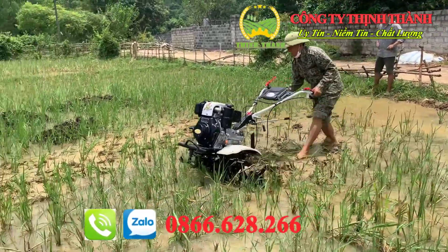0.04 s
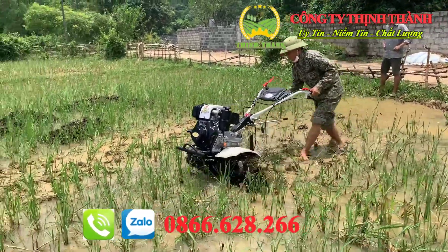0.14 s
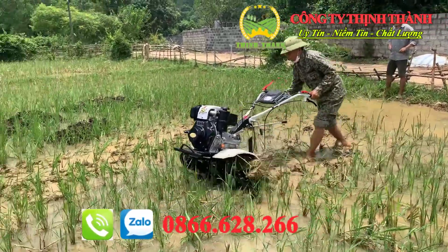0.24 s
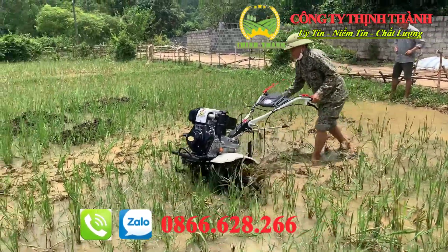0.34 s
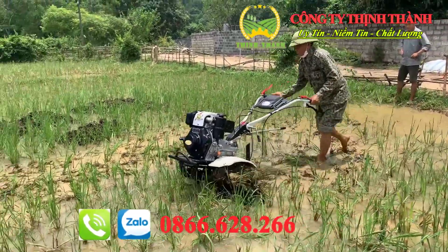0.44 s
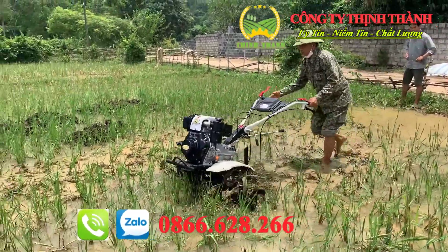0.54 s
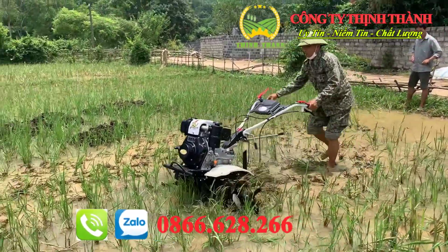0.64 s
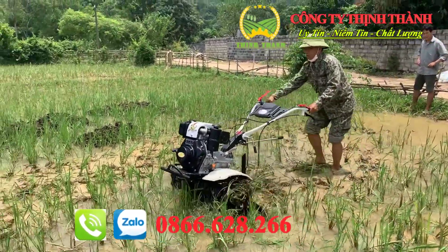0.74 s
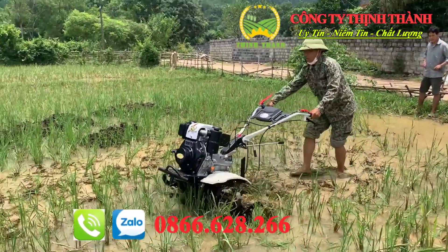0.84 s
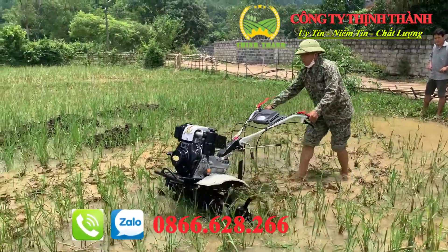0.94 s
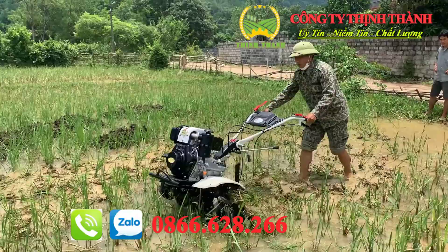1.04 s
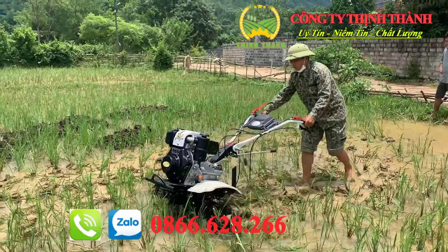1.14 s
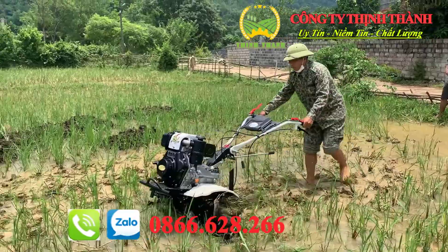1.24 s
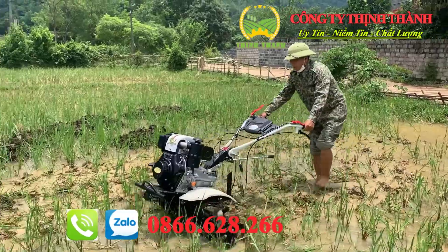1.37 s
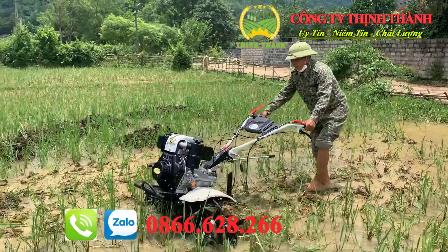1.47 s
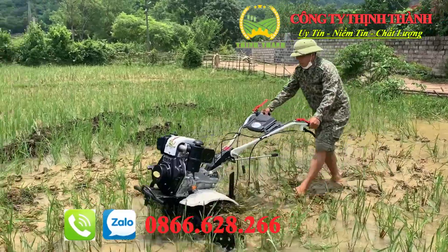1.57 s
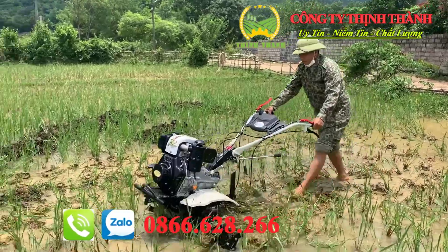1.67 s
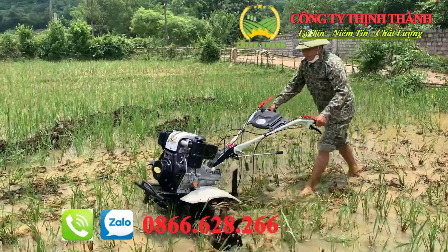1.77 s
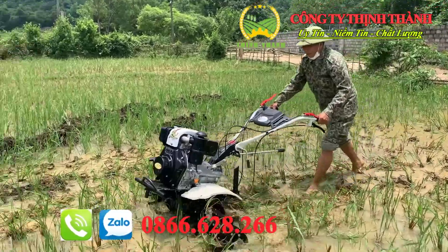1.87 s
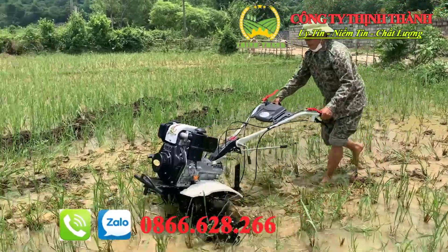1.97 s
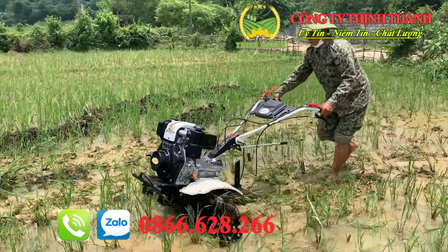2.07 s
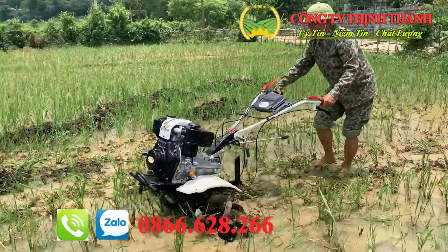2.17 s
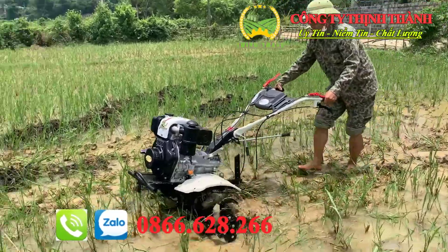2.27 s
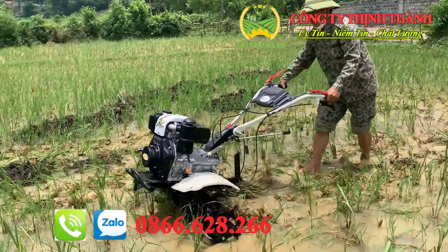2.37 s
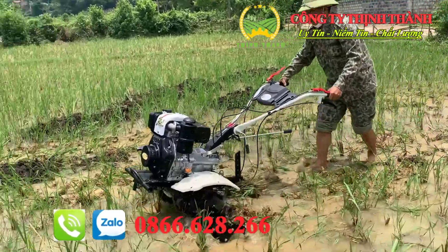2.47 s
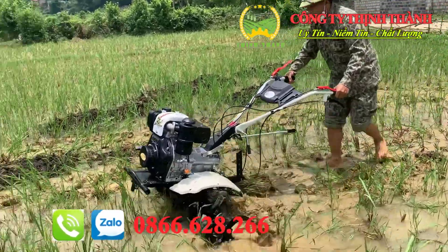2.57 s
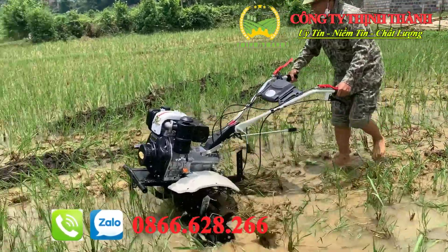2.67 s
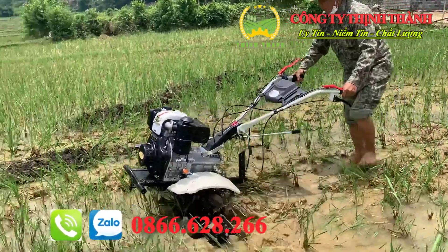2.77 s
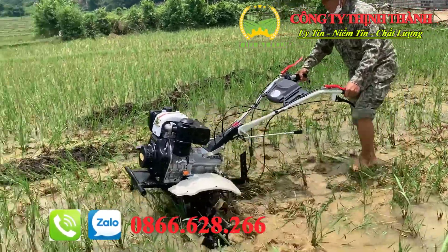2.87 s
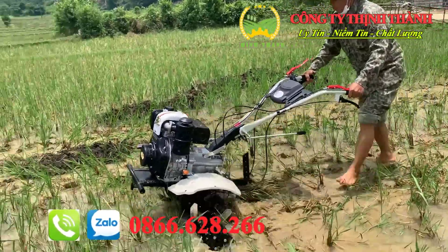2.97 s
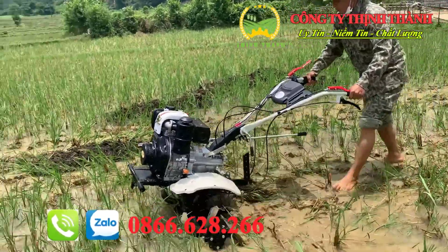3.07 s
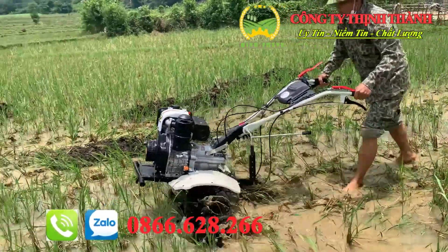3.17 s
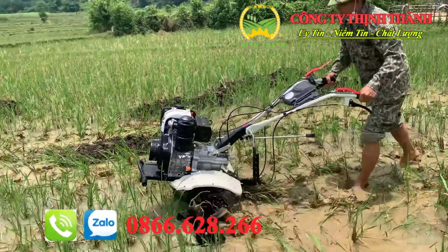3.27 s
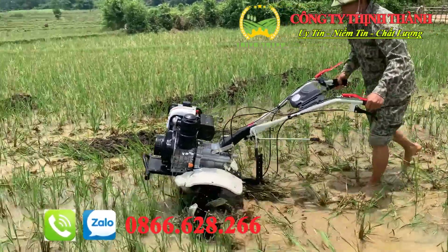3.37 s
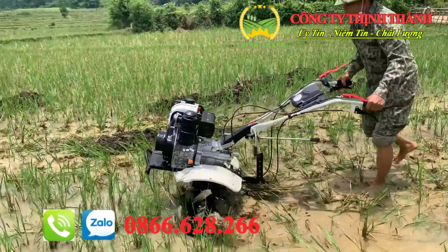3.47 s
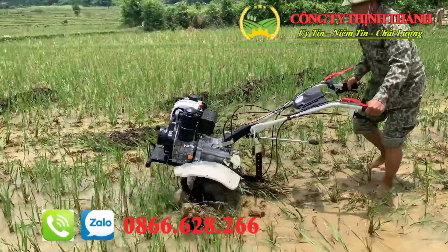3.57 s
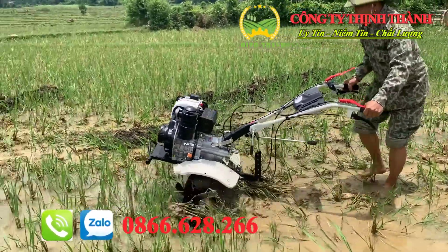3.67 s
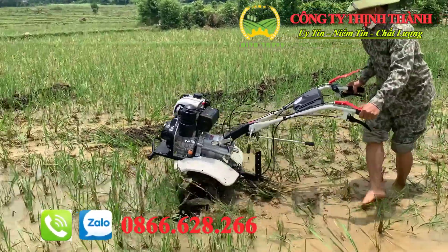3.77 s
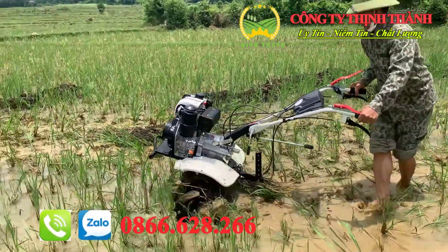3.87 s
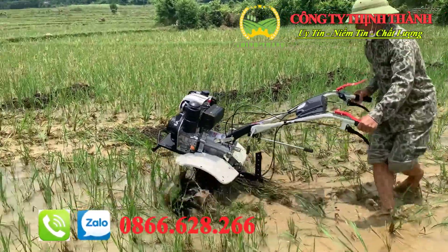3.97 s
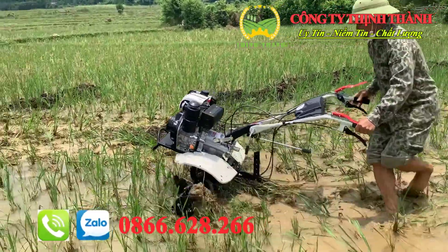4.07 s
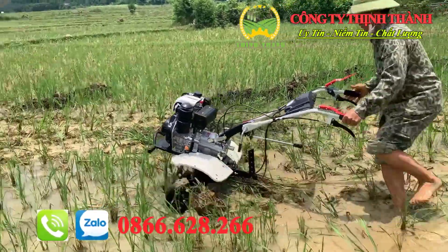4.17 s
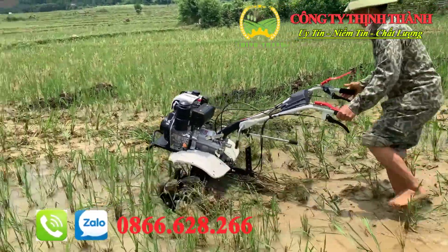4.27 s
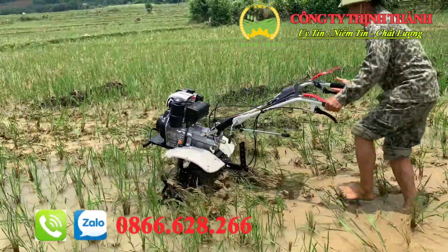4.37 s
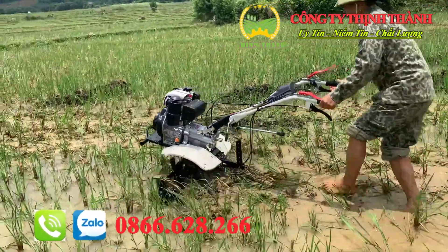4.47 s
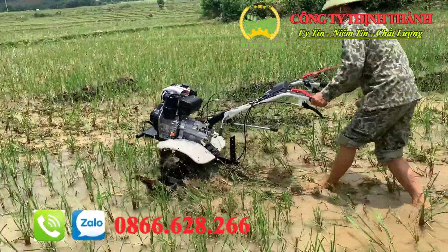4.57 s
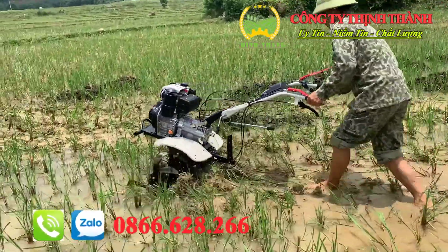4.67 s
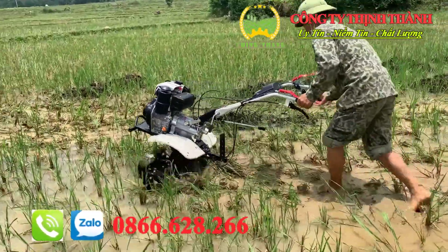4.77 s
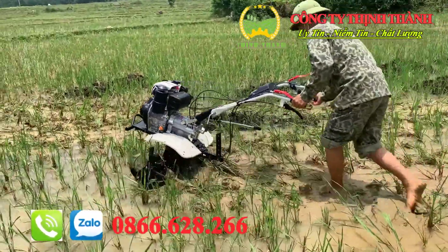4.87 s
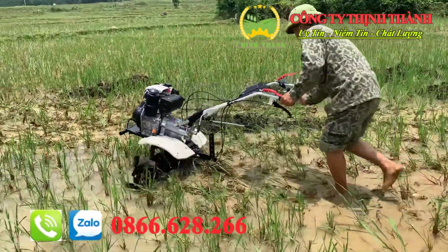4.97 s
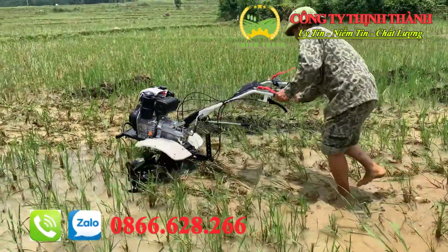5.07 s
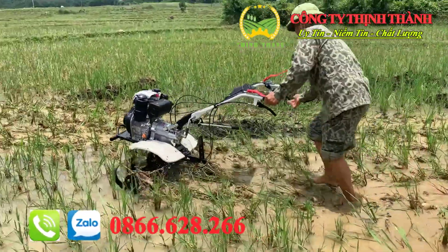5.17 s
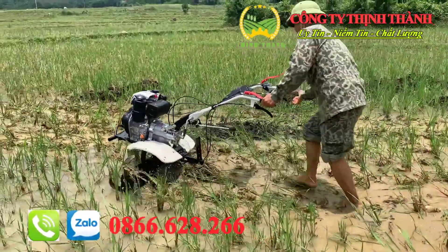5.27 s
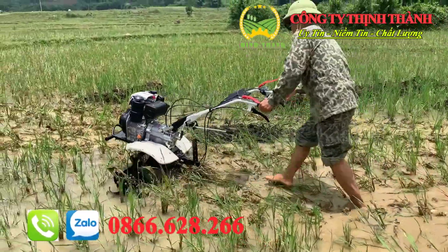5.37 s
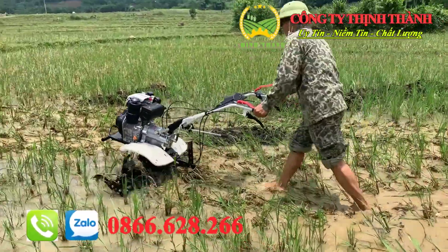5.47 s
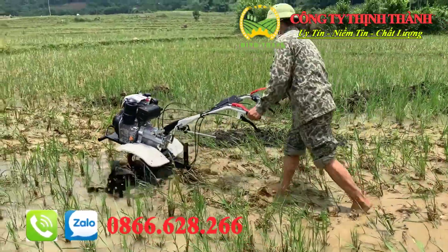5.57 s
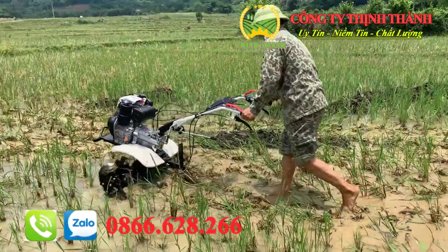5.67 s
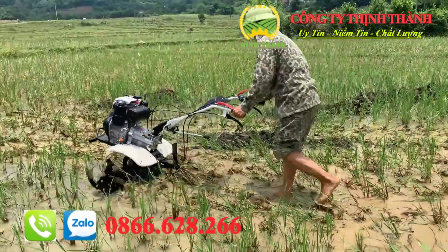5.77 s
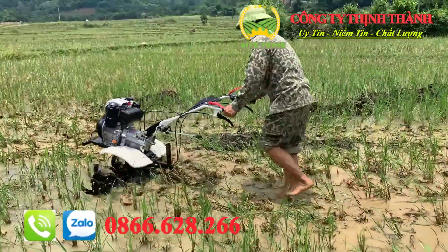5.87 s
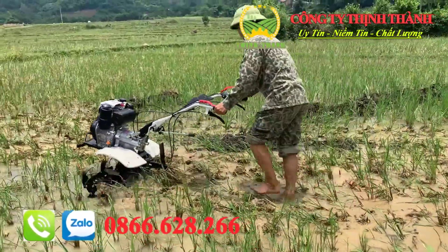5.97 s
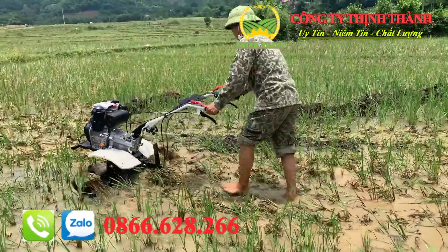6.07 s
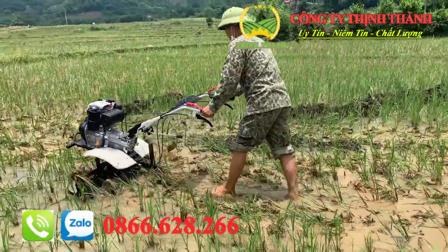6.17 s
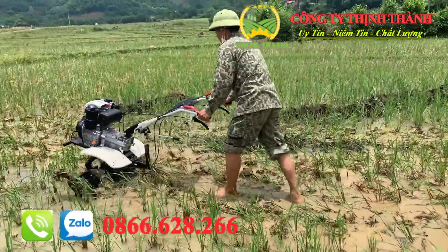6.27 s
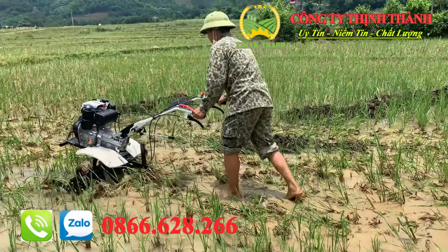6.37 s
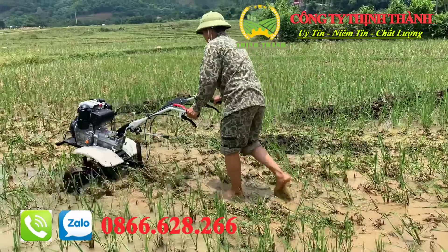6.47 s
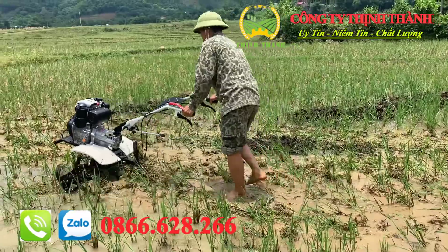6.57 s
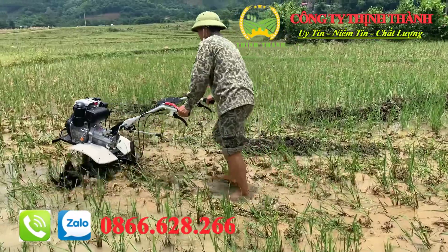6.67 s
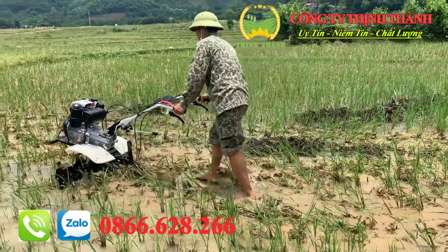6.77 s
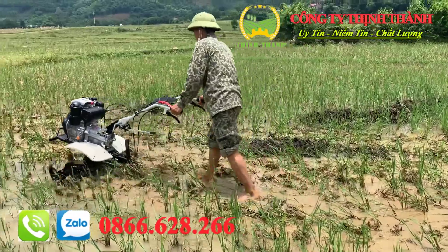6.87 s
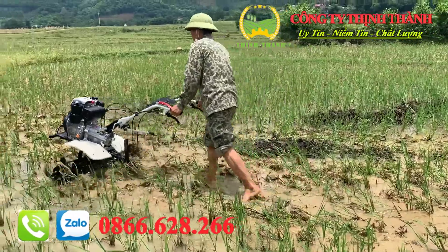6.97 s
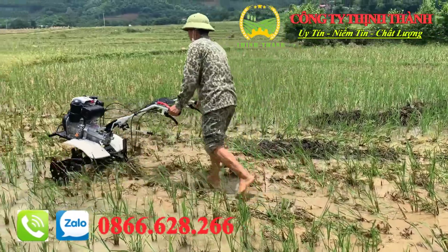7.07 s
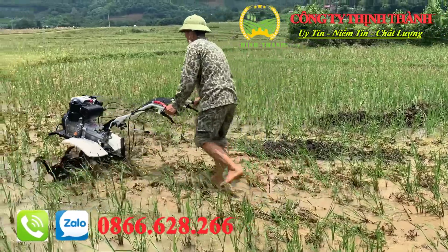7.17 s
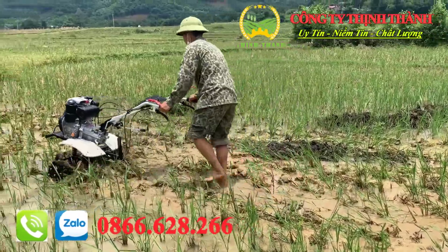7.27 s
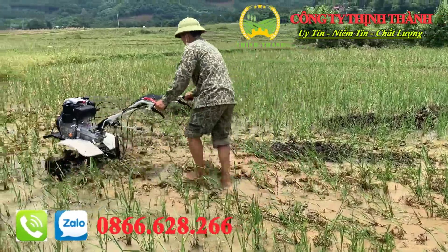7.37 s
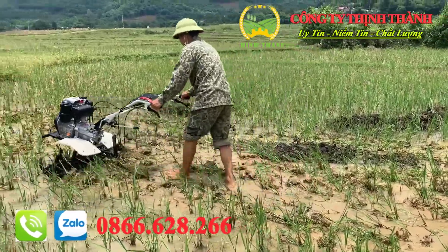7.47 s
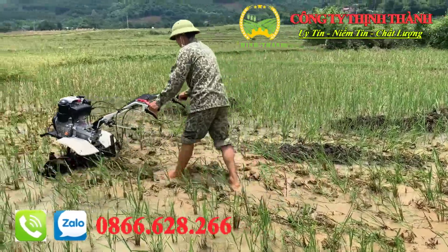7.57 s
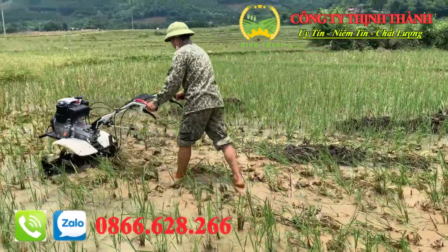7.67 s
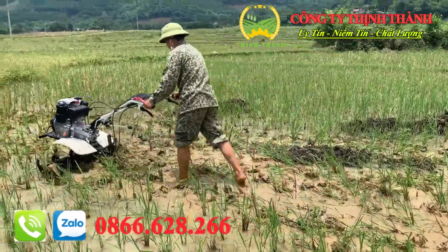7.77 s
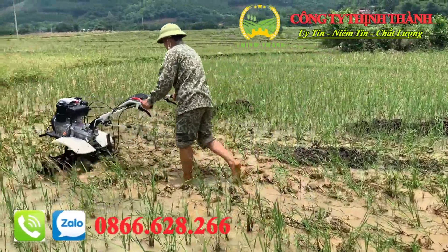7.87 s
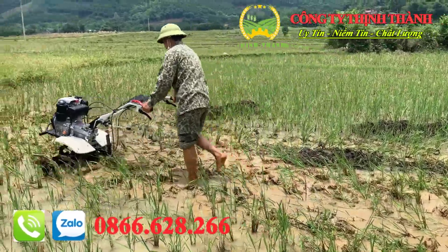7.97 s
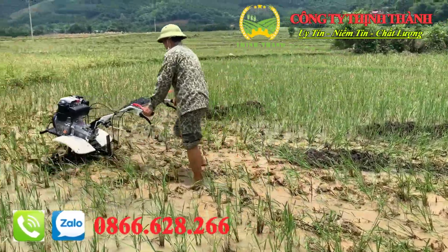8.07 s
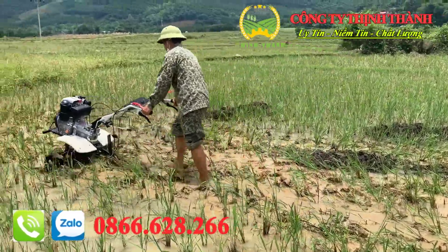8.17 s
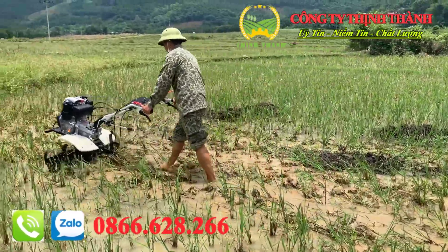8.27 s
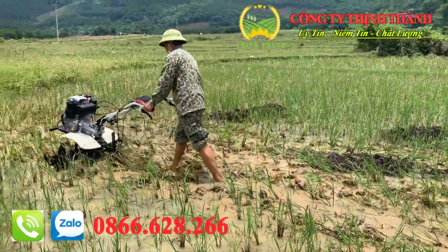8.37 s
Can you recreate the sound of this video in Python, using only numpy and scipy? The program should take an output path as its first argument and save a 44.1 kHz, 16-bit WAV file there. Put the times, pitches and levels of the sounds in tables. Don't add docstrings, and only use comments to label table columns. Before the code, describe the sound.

A walking tiller's diesel engine hammers continuously from start to end, its low muffler throb under rapid metal knocking, buzzing loose parts and bright hiss. Blades stir wet soil only faintly beneath. Heard on a close handheld stereo microphone in open air, it swells to its nearest point before midway, then recedes slightly leftward, with tail-pipe tone more exposed and faint dull reflections from banks and a wall.

```python
import sys
import numpy as np
from scipy import signal
from scipy.fft import rfft, irfft, next_fast_len
from scipy.io import wavfile
from scipy.ndimage import uniform_filter1d, map_coordinates

SR = 44100
rng = np.random.default_rng(int(sys.argv[2]) if len(sys.argv) > 2 else 0)


def output_pcm(signal):
    pcm = np.clip(np.atleast_2d(signal).T, -1, 1) * 32767
    wavfile.write(sys.argv[1], SR, np.round(pcm).astype(np.int16))


def makeup_ratio(level_db):
    decades = np.asarray(level_db, float) / 20
    return 10 ** decades


N = 371763

NEAR_M = 3.0

# time_s, rate_cycles_per_s
SPEED = [(0.0, 22.077), (0.48, 22.359), (0.79, 22.192), (1.08, 22.378), (1.87, 22.076), (2.45, 22.135),
         (3.48, 22.498), (4.08, 22.353), (4.18, 22.077), (4.59, 21.627), (5.08, 22.036), (5.84, 22.0),
         (6.32, 21.776), (6.63, 22.055), (7.26, 21.873), (7.81, 22.332), (7.97, 22.095), (8.43, 22.316)]
# time_s, distance_m, heading_deg (0 = facing the listener), left_lead_samples
PASS = [(0, 5.4, 3.7, 0.64), (1, 4.98, 20.6, 1.24), (2, 4.25, 33, 2), (2.8, 3.72, 68.4, 2),
        (3.4, 3.5, 82.5, 1.3), (3.9, 3.83, 116, 1.7), (4.6, 4.54, 125, 1.9), (5.5, 4.62, 136.3, 4.45),
        (6.5, 4.5, 162, 5.6), (7.5, 4.9, 169.5, 6.1), (8.43, 5.2, 171, 6.2)]
HEADINGS = [0, 45, 68, 90, 135, 155, 180]
RADIATES_DB = {"muffler": (-14.5, -15.5, -15, -15.5, -15.5, -17, -16.5),
               "chuff": (-24.5, -27.5, -33, -34, -36, -34, -30.5),
               "tail mode": (-41, -38, -53, -55, -32, -31.5, -28),
               "gear": (-40.5, -35.5, -35, -34, -43, -53, -37),
               "valve pop": (-22.5, -29, -29, -28, -25.5, -24, -25.5),
               "port thump": (-47.5, -36.5, -38.5, -35.5, -41, -48, -47),
               "cowl": (-36.5, -28.5, -28.5, -25.5, -27.5, -30, -29.5),
               "block": (-23.5, -29, -27.5, -26, -26, -30, -32),
               "head": (-26, -31, -29, -32.5, -36.5, -36, -32.5),
               "rattle": (-24, -23.5, -25, -25.5, -23.5, -25, -25),
               "hiss": (-33, -31.5, -32, -32.5, -31, -32, -31.5)}
METAL_AHEAD = (.022, 0.0035)

# place_in_cycle, signed_strength, pitch_hz, t60_s
PUFFS = [
    (.995, -2.05, 66, .087),
    (.452, 7.0, 136, .057),
    (.667, 3.9, 132, .135),
]
# place_in_cycle, start_hz, climb_hz_per_s, rise_s
POP = [
    (0.576, 700, 114600, 0.00086),
    (0.575, 784, 61000, 0.00093),
]
# peak_place_in_cycle, pitch_hz, t60_s, level_db, heading_deg, beam_width_deg
KNOCKS = [(.07, 760, 0.0148, -40.5, 69, 33), (.105, 799, .012, -30, 131, 21.6),
          (0.5, 800, 0.012, -51, 46, 23), (.09, 926, 0.01417, -28, 2, 39),
          (.15, 980, 0.0107, -36.5, 10, 31), (.22, 1114, 0.0149, -31.5, 56, 16),
          (.1, 1400, 0.0124, -33, 71, 18), (.105, 926, 0.0115, -29.5, 104, 23),
          (.115, 1015, 0.01117, -25, 148.5, 21.8), (.3, 1080, 0.0132, -31.5, 172, 16),
          (0, 1284, 0.01305, -26.5, 3, 11), (.19, 1474, 0.0161, -32.5, 50, 24),
          (.07, 1510, 0.0114, -33, 128, 20), (0.15, 1410, 0.01364, -36, 129, 10.5),
          (.35, 1310, 0.0186, -35.5, 120, 13), (.095, 1633, 0.01407, -22, 134, 16.3),
          (.2, 1620, 0.01421, -24.5, 30.5, 14.7), (.07, 1580, 0.0113, -31, 15, 18),
          (.32, 1690, 0.0142, -33.5, 94, 49), (.1, 1593, 0.0141, -30, 181, 22),
          (.125, 1927, 0.00954, -27.5, 42, 22), (.1, 1880, 0.0109, -25, 83, 7),
          (.15, 1835, 0.01465, -28, 139, 16), (.06, 1960, .008, -35, 157, 15),
          (.06, 2300, 0.0081, -34, 102, 20), (0.2, 1100, 0.0208, -39, -3, 10),
          (.645, 900, 0.0179, -29, 152, 19), (.61, 1050, 0.0169, -31.5, 59, 20)]
# place_in_cycle, level_db
BLOWS = [
    (.092, -2),
    (0.169, -6.5),
    (0.301, -10.5),
    (.46, -16.5),
    (0.601, -15.5),
    (.8, -14.5),
]
# place_in_cycle, level_db
SEATS = [
    (.07, 3.5),
    (.33, -7.5),
    (.54, -0.5),
    (.85, 0),
]

# pitch_hz, facing_db, side_on_db, turned_away_db, t60_s
COWL_MODES = [(737, -4.5, -0.5, -14.5, 0.092), (953, -8, -1, -2, 0.09), (1065, -8, -6, -12, 0.099),
              (1220, -5, -16, -7, 0.11)]
# pitch_hz, facing_db, side_on_db, turned_away_db, t60_s
BLOCK_MODES = [(1343, -2, -4, -16, 0.056), (1459.5, -9, -1.5, -4.5, 0.075), (1552, -4, -5, -1, 0.11),
               (1653, -3.5, 5, -2, 0.056), (1779, -0.5, -4.5, -2, 0.095), (1846.4, 3, 1.5, 4.5, 0.11),
               (2157, 3, -2, -15, 0.084)]
# pitch_hz, facing_db, side_on_db, turned_away_db, t60_s
HEAD_MODES = [(2310, 10, 18.5, -4, 0.0072), (2800, -15, -19, -26, 0.011), (3100, 3, 14, -23, 0.013),
              (3370, -15, -9, 0.5, 0.027), (4200, -7, -4, -4, 0.037), (4700, 0, -12, 2, 0.013),
              (4950, -24, -11, -4.5, 0.16), (5810, -7, -6, -10, 0.049), (6150, -22, -8.5, -17, 0.058),
              (8110, -1, 16.5, -9, 0.013)]
# pitch_hz, t60_s, level_db, heading_deg, beam_width_deg
PANELS = [(1170, 0.049, -34, 55, 18), (1950, 0.062, -41, 87, 7.8), (639, 0.07, -42, 108, 69),
          (372, 0.033, -38.5, 64, 16)]

# pitch_hz, level_db
RATTLE = [(250, 1), (400, -15.5), (550, -9.5), (800, -2), (1200, -6.5), (1700, -5.5), (2200, -3),
          (3200, -5), (3800, -16), (4600, -6), (5400, -11.5), (7000, -12), (8000, -17)]
# pitch_hz, level_db (per Hz)
HISS = [(4500, -55), (6000, 9), (8000, 3), (10000, 8), (13000, 6), (15500, -8)]
# pitch_hz, likeness_0_to_1
LIKENESS = [(200, 0.92), (1000, 0.79), (2400, 0.52), (4000, 0.35), (6000, 0.81), (7000, 0.087),
            (7600, 0.22), (14000, 0.64)]
# left_delay_s, right_delay_s, level_db
ECHOES = [
    (.0131, 0.024, -18.5),
    (.0293, 0.026, -14.5),
    (.047, 0.054, -29),
]

# pitch_hz, level_db, lead_rad
PORT = [(30, -2.5, 0.33), (420, -3, -0.082), (650, -5, 0.47), (1410, -1, -0.18), (1675, -3.5, 0.53),
        (3260, 0.5, 1), (3480, 5.5, 1), (4500, 0, -0.99), (5200, -2, 0.48), (7200, -2, -0.27),
        (7400, 3.5, -1.84), (8610, 0.5, -np.pi)]
# pitch_hz, half_width_hz, depth_db
SUM_NULLS = [(8620, 260, -22), (11880, 330, -20), (15250, 480, -25)]
# pitch_hz, half_width_hz, depth_db
LEFT_NULLS = [(520, 70, -7), (2010, 60, -9), (2700, 90, -14), (5500, 140, -9)]
LEFT_LEAD = (3.5, 6.3)


def rms_one(x):
    return x / np.sqrt(np.mean(x ** 2) + 1e-20)


def in_time(rows):
    time_s, *columns = np.transpose(rows)
    return [np.interp(np.arange(N) / SR, time_s, column) for column in columns]


def at_hz(points, hz, axis=1):
    points = np.array(points)
    return np.interp(np.log(hz), np.log(points[:, 0]), points[:, axis])


def drift(rate):
    r = np.exp(-80 * np.pi * rate / SR)
    chance = rng.standard_normal(N // 40 + 2002)
    slow = signal.lfilter([1], [1, -2 * r, r * r], chance)[2000:]
    return np.interp(np.arange(N) / 40, np.arange(len(slow)), rms_one(slow))


def ring(clicks, hz, t60):
    r = makeup_ratio(-60 / (t60 * SR))
    w = 2 * np.pi * hz / SR
    return signal.lfilter([0, np.sin(w)], [1, -2 * r * np.cos(w), r * r], clicks + 1e-18)


def fade(x, hz):
    r = np.exp(-2 * np.pi * hz / SR)
    return signal.lfilter([1 - r], [1, -r], x)


def above(x, hz):
    return signal.sosfilt(signal.butter(4, hz, "high", fs=SR, output="sos"), x)


def ticks(cycles, contacts, spread_db, jitter):
    out = np.zeros(N)
    whole = np.arange(int(cycles[-1]) + 1)
    for place, level_db in contacts:
        chance = rng.standard_normal((len(whole), 2))
        at = np.searchsorted(cycles, whole + place + jitter * chance[:, 0])
        strength = makeup_ratio(level_db + spread_db * chance[:, 1])
        out[at[at < N]] += strength[at < N]
    return out


def clap(cycles, place, hz, t60):
    pulses = ticks(cycles, [(place, 0)], spread_db=1.2, jitter=.001)
    return rms_one(ring(ring(pulses, hz, t60), hz, t60))


def beam(heading, aim, width):
    return np.exp(-((heading - aim) / width) ** 2 / 2)


def banded_noise(spectrum, patchy_db):
    out = 0
    white = rng.standard_normal((2, 2, N))
    lowest, highest = spectrum[0][0], spectrum[-1][0]
    edges = lowest * 2 ** np.arange(0, np.log2(highest / lowest) + 1 / 6, 1 / 3)
    for k, (low, high) in enumerate(zip(edges, edges[1:])):
        band = signal.butter(2, [low, high], "band", fs=SR, output="sos")
        mid, side = signal.sosfilt(band, white[k % 2])
        hz = np.sqrt(low * high)
        alike = np.clip(at_hz(LIKENESS, hz), 0, 1)
        gain = makeup_ratio(at_hz(spectrum, hz) + patchy_db * drift(3.2))
        out = out + gain * (np.sqrt(1 + alike) * mid + np.sqrt(1 - alike) * side * [[1], [-1]])
    return rms_one(out)


def gated(noise, clicks, fall_hz, floor):
    swell = rms_one(fade(fade(clicks, fall_hz), 420))
    return rms_one(noise * (floor + swell))


def muffler(cycles):
    rings = 0
    for place, size, hz, t60 in PUFFS:
        rings = rings + size * ring(ticks(cycles, [(place, 0)], spread_db=.3, jitter=.001), hz, t60)
    soft = fade(fade(rings, 80), 80)
    return rms_one(soft - np.mean(soft))


def chuff(cycles):
    pulses = ticks(cycles, [(.36, 0), (.55, -3)], spread_db=1.0, jitter=.001)
    pulses += makeup_ratio(-45.5) * rng.standard_normal(N)
    low = ring(ring(pulses, 225.0, 0.019), 194.0, 0.051)
    high = ring(ring(pulses, 267, 0.022), 289.6, 0.022)
    return rms_one(low), rms_one(high)


def gear(cycles):
    return makeup_ratio(1.5 * drift(3)) * np.sin(2 * np.pi * 19 * cycles + .15 * drift(8))


def knocks(cycles, heading):
    out = 0
    rate = cycles[-1] * SR / N
    for peak, hz, t60, level_db, aim, width in KNOCKS:
        contact = peak - rate * t60 / np.log(1000)
        out = out + makeup_ratio(level_db) * beam(heading, aim, width) * clap(cycles, contact, hz, t60)
    return out


def struck_body(blows, cycles, away, modes, uneven_db):
    out = np.zeros((2, N))
    whole = cycles.astype(int)
    for k, (hz, *heading_db, t60) in enumerate(modes):
        strength = makeup_ratio(uneven_db * rng.standard_normal(whole[-1] + 1))[whole]
        heard = makeup_ratio(np.interp(away, [0, .5, 1], heading_db) + 2.2 * drift(.7))
        lean = makeup_ratio(1.5 * rng.standard_normal() * np.array([[1], [-1]]))
        out += (-1) ** k * lean * heard * ring(blows * strength, hz, t60)
    return out / np.sqrt(uniform_filter1d(np.mean(out ** 2, axis=0), size=SR // 3))


def valve_pop(cycles, away):
    place, start_hz, climb, rise_s = (np.interp(away, [0, 1], column) for column in np.transpose(POP))
    since = cycles + 1 - place
    s = since % 1 / in_time(SPEED)[0]
    strength = makeup_ratio(1.2 * rng.standard_normal(int(since[-1]) + 2))[since.astype(int)]
    turns = start_hz * s + climb * rise_s * (s - rise_s * np.arctan(s / rise_s))
    swell = (s / rise_s) ** 2 * np.exp(-s / rise_s)
    valve = rms_one(strength * swell * np.sin(2 * np.pi * turns))
    valve += 0.11 * clap(cycles, 0.5, 1046, 0.0093)
    valve += 0.26 * away * clap(cycles, 0.66, 961, 0.041)
    return rms_one(above(valve, 597))


def port_thump(cycles):
    return clap(cycles, .56, 443, 0.021)


def panels(blows, heading):
    out = 0
    for hz, t60, level_db, aim, width in PANELS:
        panel = rms_one(ring(ring(blows, hz, t60), hz, t60 / 4))
        out = out + makeup_ratio(level_db) * beam(heading, aim, width) * panel
    return out


def rattle(cycles):
    shaken = ticks(cycles + 0.021, BLOWS, spread_db=1.8, jitter=0.013)
    return gated(banded_noise(RATTLE, patchy_db=1.0), shaken, fall_hz=26, floor=1.3)


def hiss(cycles):
    spits = ticks(cycles, SEATS, spread_db=3.0, jitter=0.0073)
    return gated(banded_noise(HISS, patchy_db=.5), spits, fall_hz=25.3, floor=1.1)


def splash():
    sizes = makeup_ratio(6.8 * np.minimum(rng.exponential(1, N), 2.0)) * rng.choice([-1, 1], N)
    born = rng.random(N) < 250 * makeup_ratio(6.0 * drift(4)) / SR
    pitches = np.geomspace(1500, 9000, 8)
    dealt = rng.integers(0, 8, N)
    return rms_one(sum(ring(sizes * born * (dealt == k), hz, 5.5 / hz) for k, hz in enumerate(pitches)))


def echoes(x):
    dull = fade(np.mean(x, axis=0), 6200)
    out = np.zeros((2, N))
    for *delays, level_db in ECHOES:
        for side, delay in enumerate(delays):
            out[side] += makeup_ratio(level_db) * np.roll(dull, int(delay * SR))
    return out


def scene():
    cycles = np.cumsum(in_time(SPEED)[0]) / SR
    distance, heading, _ = in_time(PASS)
    away = (1 - np.cos(np.radians(heading))) / 2
    near = NEAR_M / distance
    gain = {part: makeup_ratio(np.interp(heading, HEADINGS, db)) * near for part, db in RADIATES_DB.items()}

    low_mode, tail_mode = chuff(cycles)
    gas = gain["muffler"] * muffler(cycles)
    gas += gain["chuff"] * low_mode + gain["tail mode"] * tail_mode
    gas += gain["gear"] * gear(cycles)
    firing = above(knocks(cycles, heading), 630)

    cycles = cycles + np.interp(away, [0, 1], METAL_AHEAD)
    blows = ticks(cycles, BLOWS, spread_db=1.0, jitter=.0005)
    buzz = rng.standard_normal(N)
    soft = fade(fade(blows + makeup_ratio(-41) * buzz, 800), 1400)
    sharp = blows + makeup_ratio(-37) * buzz
    cowl = struck_body(soft, cycles, away, COWL_MODES, uneven_db=0.5)
    block = struck_body(soft, cycles, away, BLOCK_MODES, uneven_db=0.5)
    head = struck_body(sharp, cycles, away, HEAD_MODES, uneven_db=2.5)

    metal = gain["cowl"] * above(cowl, 630)
    metal += gain["block"] * above(block, 930)
    metal += gain["valve pop"] * valve_pop(cycles, away)
    metal += gain["port thump"] * port_thump(cycles)
    metal += (panels(soft, heading) + firing) * near
    metal += gain["head"] * above(head, 650)
    metal += gain["hiss"] * hiss(cycles)
    loose = gain["rattle"] * (rattle(cycles) + makeup_ratio(-19) * splash())
    return gas + loose + metal + echoes(metal)


def nulls(pair):
    size = next_fast_len(N)
    hz = np.fft.rfftfreq(size, 1 / SR)
    both = rfft(np.mean(pair, axis=0), size)

    def lost(dips):
        depth_db = sum(db * np.exp(-((hz - at) / width) ** 2) for at, width, db in dips)
        return irfft(both * (1 - makeup_ratio(depth_db)), size)[:N]

    moved_left = np.interp(in_time(PASS)[-1], LEFT_LEAD, [0, 1])
    return pair - lost(SUM_NULLS) - moved_left * lost(LEFT_NULLS)


def top_cut(x):
    return signal.sosfilt(signal.butter(12, 15750, fs=SR, output="sos"), x)


def record(dry):
    rumble_cut = signal.butter(4, 35, "high", fs=SR, output="sos")
    dry = signal.sosfiltfilt(rumble_cut, dry, padtype="even", padlen=4000)
    size = next_fast_len(N + 4096)
    hz = np.maximum(np.fft.rfftfreq(size, 1 / SR), 1)
    last_hz = PORT[-1][0]
    ahead = at_hz(PORT, hz, axis=2) - 2 * np.pi * (np.clip(hz, last_hz, 14900) - last_hz) / 3130
    left = rfft(dry[0], size) * makeup_ratio(at_hz(PORT, hz)) * np.exp(1j * ahead)
    low = 1 / (1 + (hz / 7600) ** 20)
    lead = in_time(PASS)[-1]
    early = map_coordinates(irfft(left * low, size), [np.arange(N) + lead], order=2, mode="wrap")
    high = irfft(left * (1 - low), size)[:N]
    return top_cut(nulls(np.array([early + high, dry[1]])))


dry = scene()
out = record(dry)
output_pcm(out)
```